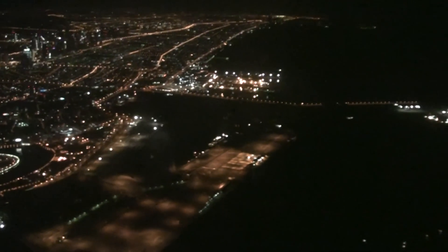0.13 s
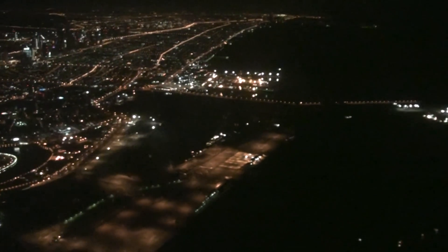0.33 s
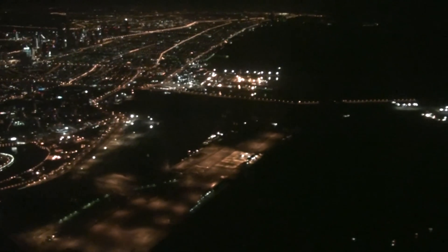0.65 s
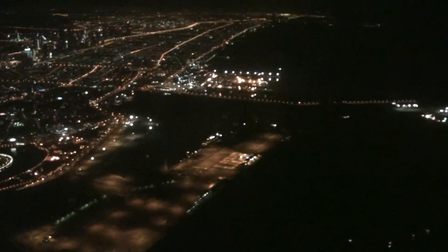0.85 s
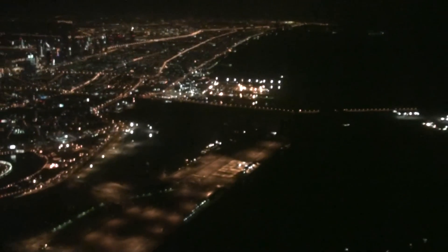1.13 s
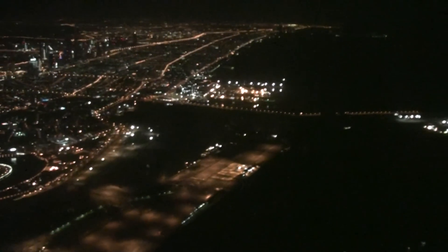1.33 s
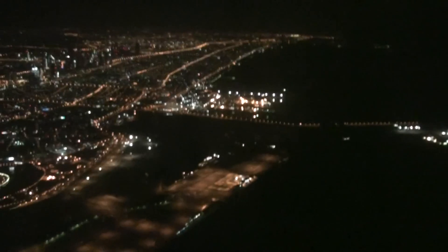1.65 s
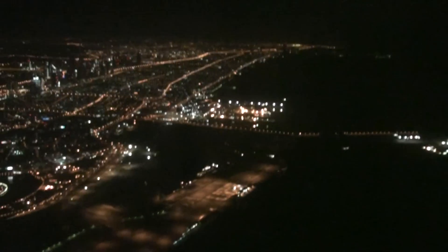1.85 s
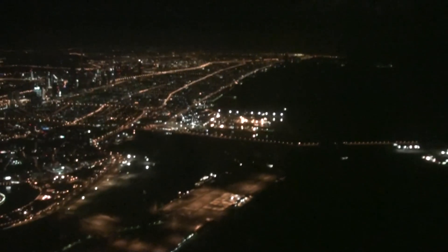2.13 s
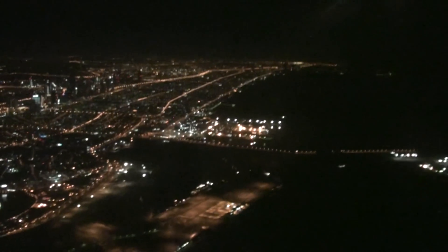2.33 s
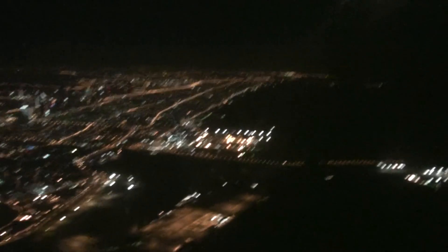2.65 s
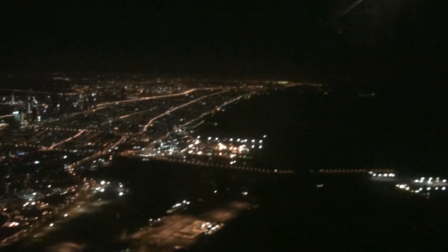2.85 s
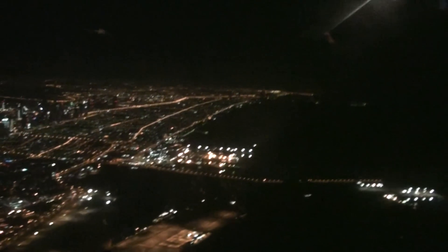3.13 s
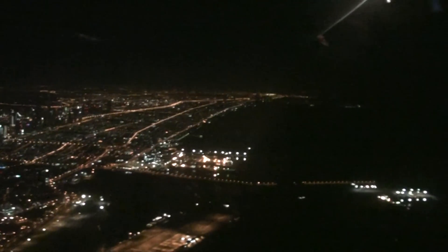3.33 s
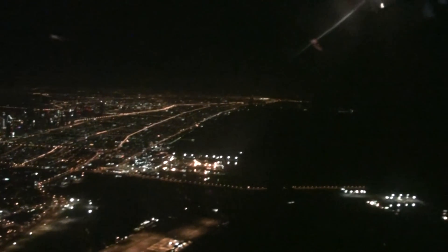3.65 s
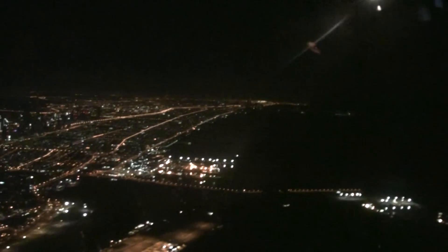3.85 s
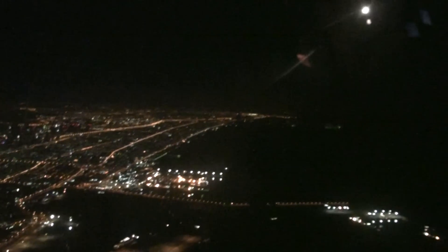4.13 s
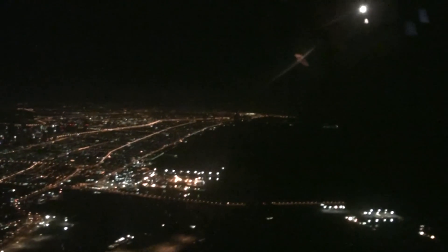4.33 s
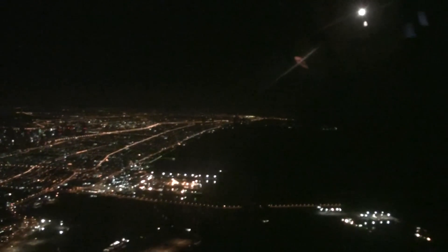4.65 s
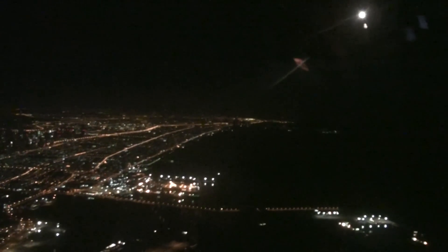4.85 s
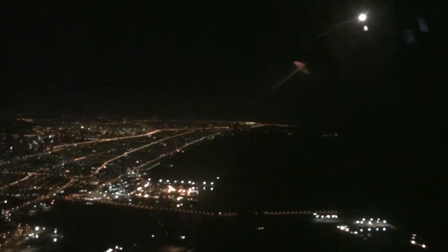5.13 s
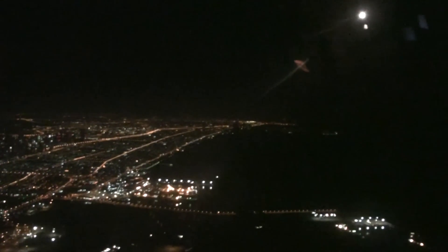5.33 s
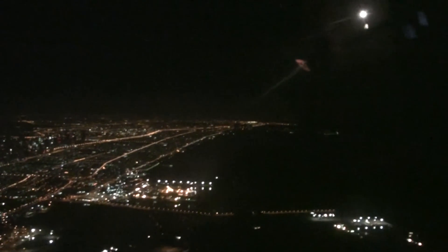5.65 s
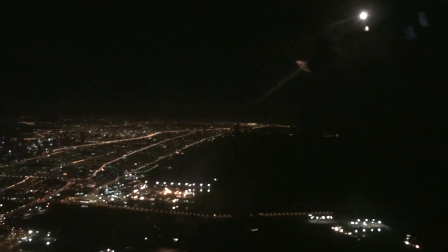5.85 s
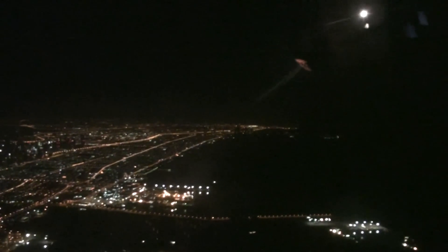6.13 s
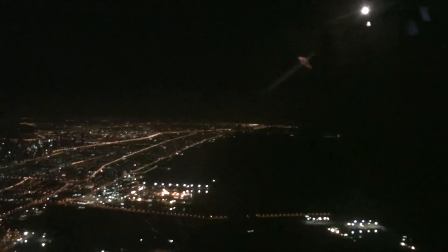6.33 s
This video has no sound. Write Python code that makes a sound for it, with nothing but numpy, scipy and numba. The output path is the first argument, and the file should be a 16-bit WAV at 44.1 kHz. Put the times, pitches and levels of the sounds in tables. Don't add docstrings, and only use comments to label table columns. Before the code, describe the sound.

Inside an airliner cabin during a night climb, a loud, deep jet roar runs unbroken for about 6.5 seconds, booming mainly in the low bass with uneven throbs. Over it lies a softer hiss of air along the skin and from vents, with very faint steady fan whistles. Bumps start at once: a strong one near 0.2 s, then trim panels chatter and knock dryly and irregularly through about 2.9 s, the window blind buzzing along. Cloth lightly brushes the camera near 0.9 s and more faintly near 2.7 s. Around 3 s the blind's buzz shifts colour. Knocks thin out, at about 3.6, 3.9, 4.5, 5.3 and 5.5 s, with lulls near 4.6 and 5.1 s; rattling rises again around 5.8 to 6.3 s, and a sharp jolt ends it near 6.5 s. Close small stereo microphones; automatic gain makes the hiss flutter against the boom, and the highest treble is coarse and mono.

```python
import sys
import numpy as np
from scipy import signal
from scipy.fft import rfft, irfft
from scipy.io import wavfile
from scipy.ndimage import uniform_filter1d, map_coordinates
from numba import njit

SR = 44100
rng = np.random.default_rng(int(sys.argv[2]) if len(sys.argv) > 2 else 0)


def level_to_linear(level):
    exponent = np.asarray(level, float) / 20
    return 10 ** exponent


def output_pcm(signal):
    pcm = np.clip(np.atleast_2d(signal).T, -1, 1) * 32767
    wavfile.write(sys.argv[1], SR, np.round(pcm).astype(np.int16))


N = 286209
HZ = np.arange(N // 2 + 1) * SR / N

# [t/s, length/s, f/Hz, width/Hz, level/dB]
BRUSHES = [
    (.94, .03, 3400, 1100, -52),
    (2.69, .028, 5000, 900, -57),
]
# [f/Hz, level/dB, pitch wander/Hz]
FAN_TONES = [(807.5, -61, 5), (1422, -73, 8), (2126, -71, 8), (3472, -77, 2), (4253, -74.5, 4),
             (4760, -78, 20), (6234, -80, 5)]
# [f/Hz, width/Hz, level before tilt/dB, level after/dB]
BLIND_MODES = [(1420, 140, -71, -78), (2120, 160, -75, -68), (2620, 240, -70, -73), (4750, 200, -80, -76)]
# [f/Hz, width/Hz, lift/dB]
PANEL_MODES = [(1000, 500, 3), (1500, 500, 4), (2120, 300, 4), (2620, 400, 4), (3500, 1100, 6),
               (4800, 700, 3)]
# [t/s, peak level/dB]
KNOCKS = [(0.1104, -39.5), (0.1775, -29), (0.236, -44), (0.2853, -38), (0.4359, -45), (0.5237, -36),
          (0.6727, -43), (0.6908, -36), (0.8599, -34), (1.0335, -34), (1.2656, -33), (1.507, -32),
          (1.515, -37), (1.646, -30), (1.687, -34), (1.8891, -41), (1.907, -35), (2.0395, -32),
          (2.4305, -33), (2.4553, -40), (2.6896, -38), (2.8585, -38), (3.6212, -35), (3.906, -32),
          (4.5296, -37), (5.1215, -48), (5.2724, -31), (5.4954, -32), (5.6955, -42), (6.2856, -31)]
# [centre t/s, lift/dB, length/s]
BUMPS = [(0.178, 14, 0.24), (.3, 1, .04), (.49, -2, 0.037), (0.568, 12, 0.098), (0.696, 10.5, .09),
         (0.973, 8, .05), (1.277, 10, 0.033), (1.337, -10, 0.027), (1.52, 11, 0.045), (1.674, 5.5, 0.1),
         (1.803, -4, 0.034), (1.9, 10, 0.12), (2.02, 8, 0.023), (2.33, 11, 0.091), (2.447, 3.5, .05),
         (2.704, 12.5, 0.11), (2.868, 4, 0.11), (3.52, -8, 0.034), (3.623, 4, 0.031), (3.82, 5, 0.089),
         (3.935, 5, 0.074), (4.547, 8.5, 0.079), (4.63, -12, .05), (5.094, -14, 0.062), (5.216, 1.5, 0.09),
         (5.807, 10, 0.077), (5.995, 13.5, .06), (6.298, 6, 0.043), (6.488, 26, 0.016)]
# [t/s, hiss level/dB]
AIR_FLOW = [(0, -56), (.45, -54.5), (1.2, -54), (2.3, -54), (3.1, -54), (3.5, -54), (4.0, -54), (4.6, -55),
            (5.25, -52.5), (5.7, -53.5), (6.49, -54)]
# [f/Hz, level per Hz/dB]
AIR_COLOUR = [(350, -24), (600, 2), (689, -10.5), (802, -6), (972, -12.5), (1450, -18), (1830, -19),
              (2130, -21.5), (2290, -21.5), (2660, -21.5), (3650, -26), (5100, -23.5), (6990, -18.5),
              (10300, -35), (12500, -30.5), (16200, -47)]
# [f/Hz, width/Hz, lift/dB]
DUCT_MODES = [(800, 28, 6), (1421, 27, 7), (2115, 55, 6), (2590, 110, 4), (4730, 150, 3), (6820, 450, 2),
              (11600, 740, 4)]
# [f/Hz, level per Hz/dB]
ROAR_COLOUR = [(11, -32), (18, -36), (32, -23), (56, -11), (76, 1.5), (131, -1.5), (158, -0.5), (226, -13),
               (335, -7.5), (372, -23.5), (448, -22), (492, -29), (549, -29.5), (683, -43.5), (750, -46.5),
               (980, -47.5), (1650, -120)]
# [f/Hz, width/Hz, lift/dB]
CABIN_MODES = [(28, 5.5, 13), (41.7, 12, -1.5), (58.7, 7.1, 8), (102.6, 14.6, 2.5), (165.6, 5.8, 5.5),
               (206.2, 22.5, 5.5), (252.4, 13.4, 5.5), (296, 6.8, 3.5), (340.7, 21, 4), (389, 14.7, 7),
               (444, 20.4, 5.5), (537, 16, 4.5), (637, 40, 4)]
# [f/Hz, left leads/rad, likeness/0-1, left minus right/dB]
MICROPHONES = [(25, 0, 1, .4), (50, -.1, 1, .4), (100, -.4, .995, 1), (200, -.75, .99, .6),
               (380, -.85, .98, 0), (680, -.3, .8, 1.3), (800, .7, .85, 1), (920, 0, .85, .8),
               (1500, -.6, .9, .6), (2200, 0, .93, .7), (7000, 0, .96, .6), (9000, 0, .86, .6),
               (11000, 0, .35, .6)]
# [f/Hz, step over local level/dB]
TREBLE_STEPS = [(2000, -9.5), (4000, -4), (6000, -1.5), (11000, -1.5), (13300, 4), (15000, 8.5),
                (16400, 16)]


def on_log(table, column):
    table = np.array(table, float)
    return np.interp(np.log(HZ + 1), np.log(table[:, 0]), table[:, column])


def unit(x):
    return x / np.sqrt(np.mean(x ** 2))


def walk(rate):
    hold = int(SR / rate)
    steps = np.repeat(rng.standard_normal(N // hold + 1), hold)[:N]
    return unit(uniform_filter1d(uniform_filter1d(steps, hold), hold))


def fade(blows, seconds):
    tail = signal.lfilter([1], [1, -np.exp(-1 / (seconds * SR))], blows)
    return np.convolve(tail, np.hanning(48) / 24)[:N]


def resonance(hz, width):
    return 1 / (1 + (2 * (HZ - hz) / width) ** 2)


def at_microphones(x, stray=np.zeros(N)):
    like = np.clip(on_log(MICROPHONES, 2), 0, 1)
    turn = np.exp(.5j * on_log(MICROPHONES, 1)) * level_to_linear(on_log(MICROPHONES, 3) / 2)
    mid = np.sqrt((1 + like) / 2) * rfft(x)
    side = np.sqrt((1 - like) / 2) * rfft(stray)
    return irfft(np.array([(mid + side) * turn, (mid - side) / turn]), N)


def airborne(colour, modes):
    db = on_log(colour, 1)
    for hz, width, lift_db in modes:
        db = db + lift_db * resonance(hz, width)
    pair = at_microphones(rng.standard_normal(N), rng.standard_normal(N))
    return irfft(rfft(pair) * level_to_linear(db), N)


def shudder(t):
    return sum(lift_db * np.exp(-(2 * (t - s) / length) ** 2) for s, lift_db, length in BUMPS)


def brushes(t):
    out = np.zeros(N)
    for s, length, hz, width, db in BRUSHES:
        shape = np.exp(-((HZ - hz) / width) ** 4)
        band = unit(irfft(rfft(rng.standard_normal(N)) * shape, N))
        out += level_to_linear(db) * band * np.exp(-((t - s - length / 2) / (length / 2)) ** 2)
    return at_microphones(out)


def whines(air_db):
    tones = np.zeros(N)
    for hz, db, wander in FAN_TONES:
        level = level_to_linear(db + 3 + 3 * walk(8))
        pitch = hz + wander * walk(12)
        tones += level * np.sin(2 * np.pi * np.cumsum(pitch) / SR)
    return at_microphones(tones) * level_to_linear(air_db - air_db.mean())


def blind(t, shake_db):
    tilt_s, tilt_length_s = 3, .5
    buzz_per_shudder = .81
    after = 1 / (1 + np.exp(-4 * (t - tilt_s) / tilt_length_s))
    out = np.zeros(N)
    for hz, width, before_db, after_db in BLIND_MODES:
        mode = unit(irfft(rfft(rng.standard_normal(N)) * resonance(hz, width), N))
        out += mode * level_to_linear(before_db + (after_db - before_db) * after + 3 * walk(13))
    return at_microphones(out * level_to_linear(buzz_per_shudder * shake_db))


def rattle(effort_db, per_s=100., spread_db=1.5):
    chance = rng.random((1000, 2))
    places = (np.cumsum(.6 + .8 * chance[:, 0]) * SR / per_s).astype(int)
    size_db = spread_db * np.minimum(-np.log(chance[:, 1]), 2.5)
    inside = places < N
    slaps, hits = np.zeros(N), np.zeros(N)
    slaps[places[inside]] = level_to_linear(size_db[inside])
    knock_s, knock_db = np.transpose(KNOCKS)
    hits[(knock_s * SR).astype(int)] = level_to_linear(knock_db - 14)
    scrape = airborne(AIR_COLOUR, PANEL_MODES)
    middle = irfft(rfft(scrape) * ((HZ > 1500) & (HZ < 6000)), N)
    scrape = scrape / np.std(middle)
    mean_db = effort_db.mean()
    chatter = unit(fade(slaps, .0039)) * level_to_linear(mean_db + .46 * (effort_db - mean_db) - 8)
    return scrape * (chatter + fade(hits, .0036))


def rush(air_db):
    spectrum = rfft(airborne(AIR_COLOUR, DUCT_MODES))
    reference = np.std(irfft(spectrum * ((HZ > 5000) & (HZ < 9000)), N))
    edges = [0, 1500, 4500, 9000, SR]
    shared = walk(45)
    hiss = 0
    for low, high in zip(edges, edges[1:]):
        part = irfft(spectrum * ((HZ >= low) & (HZ < high)), N)
        hiss = hiss + part * level_to_linear(.6 * shared + .62 * walk(30))
    return hiss / reference * level_to_linear(air_db - 1.3)


def pane_echo(x):
    lag = SR * (.0026 + .00008 * walk(1.2))
    bright = irfft(rfft(x) * np.exp(-((HZ - 6000) / 2500) ** 2), N)
    places = [np.arange(N) - lag]
    echo = np.array([map_coordinates(side, places, order=3, mode="wrap") for side in bright])
    return x + .33 * echo


def roar(shake_db):
    thrust_db, roar_per_shudder = -17, .034
    return unit(airborne(ROAR_COLOUR, CABIN_MODES)) * level_to_linear(thrust_db + roar_per_shudder * shake_db)


def scene():
    t = np.arange(N) / SR
    shake_db = shudder(t)
    air_db = np.interp(t, *np.transpose(AIR_FLOW)) + .13 * shake_db
    trim_rest_db = -54
    background = brushes(t) + whines(air_db) + blind(t, shake_db)
    return background + rattle(trim_rest_db + shake_db) + pane_echo(rush(air_db)) + roar(shake_db)


@njit
def follow(x, attack, release):
    y, level = np.empty(len(x)), .2
    for i in range(len(x)):
        level += (x[i] - level) * (attack if x[i] > level else release)
        y[i] = level
    return y


def coarse_treble(x):
    hz, _, lines = signal.stft(x, SR, window="cosine", nperseg=2048, noverlap=1024)
    size = np.abs(lines) + 1e-12
    local = uniform_filter1d(uniform_filter1d(size, size=24, axis=1), size=60, axis=2)
    moments = size.shape[2]
    patches = np.repeat(rng.standard_normal((33, moments)), 32, axis=0)[:len(hz)]
    patches = patches + rng.standard_normal(moments) * (hz[:, None] > 13300)
    step_db = np.interp(hz, *np.transpose(TREBLE_STEPS), left=-40)[:, None]
    step = local * level_to_linear(step_db + 2.5 * patches)
    kept = np.maximum(np.round(size / step) * step, .18 * size)
    return signal.istft(lines * kept / size, SR, window="cosine", nperseg=2048, noverlap=1024)[1][:, :N]


def top_cut(x):
    return signal.sosfilt(signal.butter(12, 16500, fs=SR, output="sos"), x)


def record(dry):
    mono_hz, top_hz = 11000, 16520
    ahead = 240
    envelope = follow(np.abs(dry).max(axis=0), 1 / (.0019 * SR), 1 / (.0055 * SR))
    envelope = np.append(envelope[ahead:], np.full(ahead, envelope[-1]))
    gain = np.minimum(.19 / envelope, 1.15) ** .85
    spectrum = rfft(dry * gain)
    spectrum = np.where(HZ > mono_hz, .79 * spectrum.mean(axis=0), spectrum) * (HZ < top_hz)
    mix = coarse_treble(irfft(spectrum, N))
    return top_cut(mix)


dry = scene()
out = record(dry)
output_pcm(out)
```